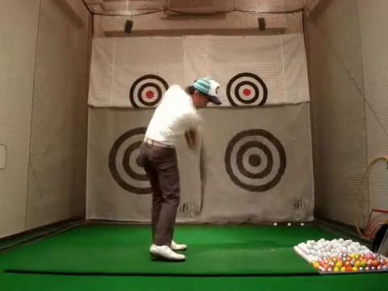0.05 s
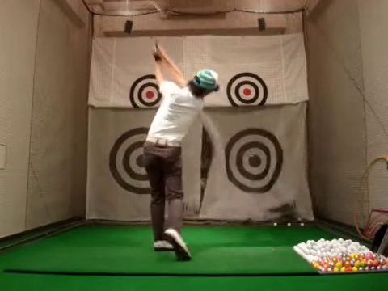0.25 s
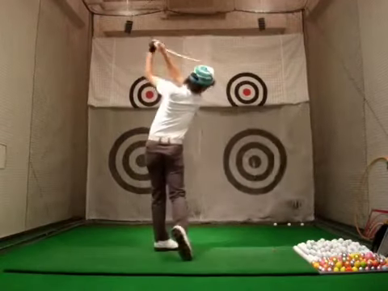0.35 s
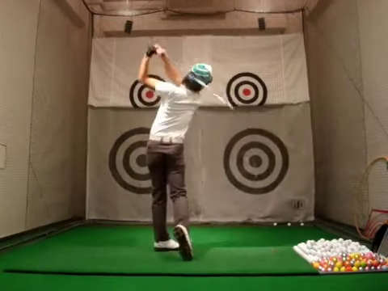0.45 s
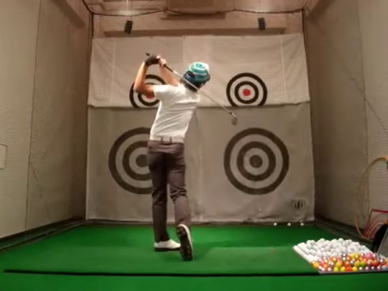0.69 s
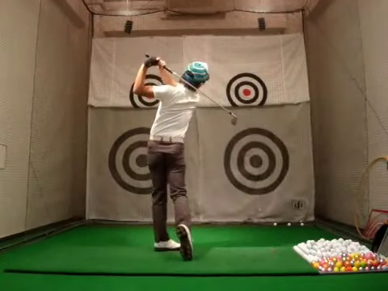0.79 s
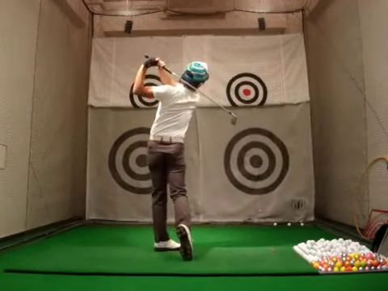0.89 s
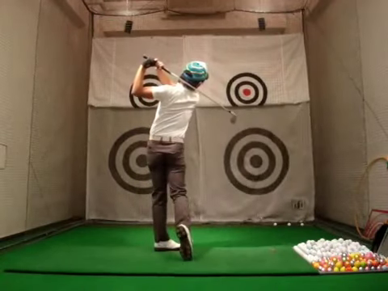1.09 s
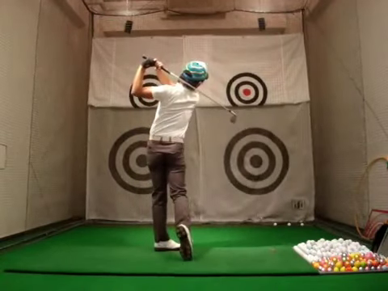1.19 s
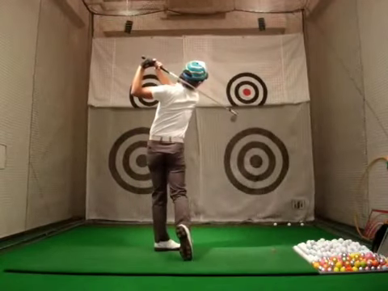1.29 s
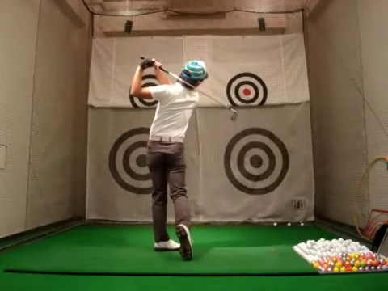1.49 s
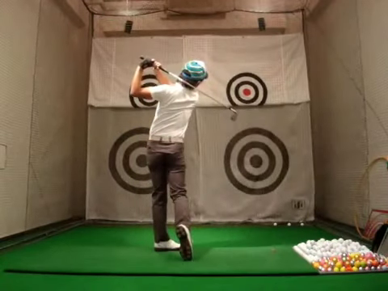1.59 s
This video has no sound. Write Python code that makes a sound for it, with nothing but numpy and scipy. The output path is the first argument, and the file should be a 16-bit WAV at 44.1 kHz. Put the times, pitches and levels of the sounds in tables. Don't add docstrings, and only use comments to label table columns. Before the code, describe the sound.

In a small hard-walled bay, a short rising swish leads to a sharp golf strike and a booming canvas impact, with ringing room tail, soft rustle and small knocks, heard by one mono microphone at some distance.

```python
import sys
import numpy as np
from scipy import signal
from scipy.fft import rfft, irfft
from scipy.io import wavfile

SR = 44100
rng = np.random.default_rng(int(sys.argv[2]) if len(sys.argv) > 2 else 0)


def to_wav(sig):
    pcm = np.clip(np.atleast_2d(sig), -1, 1) * 32767
    pcm = np.round(pcm).astype(np.int16)
    wavfile.write(sys.argv[1], SR, pcm.T)


def gain_from_db(level_db):
    decades = np.asarray(level_db, float) / 20
    return 10 ** decades


N = 72765
T = np.arange(N) / SR


def rms_one(x):
    return x / np.sqrt(np.mean(x ** 2) + 1e-20)


def in_time(rows):
    s, *columns = np.transpose(rows)
    return [np.interp(T, s, c) for c in columns]


def at_hz(points, hz):
    point_hz, value = np.array(points)[:, 0], np.array(points)[:, 1]
    return np.interp(np.log(hz), np.log(point_hz), value)


def drift(rate_hz):
    r = np.exp(-2 * np.pi * rate_hz / SR)
    slow = signal.lfilter([1], [1, -2 * r, r * r], rng.standard_normal(N + SR))
    return rms_one(slow[SR:])


EDGES_HZ = 28 * 2 ** np.arange(0, 9.4, 1 / 3)


def bands():
    hz, noise = np.fft.rfftfreq(N, 1 / SR), rfft(rng.standard_normal(N))
    centres_hz = np.sqrt(EDGES_HZ[1:] * EDGES_HZ[:-1])
    place = np.interp(np.log(hz + 1), np.log(centres_hz), np.arange(len(centres_hz)))
    out = []
    for k in range(len(centres_hz)):
        window = np.cos(np.pi / 2 * np.clip(place - k, -1, 1))
        out.append(irfft(noise * window, N))
    return centres_hz, out


def shares(spectrum, hz):
    gain = gain_from_db(at_hz(spectrum, np.minimum(hz, 9900)))
    width_hz = hz * (2 ** (1 / 3) - 1)
    return gain / np.sqrt(np.sum(gain ** 2 * width_hz * 2 / SR))


def resonate(x, hz, width_hz):
    r = np.exp(-np.pi * width_hz / SR)
    poles = [1, -2 * r * np.cos(2 * np.pi * hz / SR), r * r]
    return signal.lfilter([(1 - r * r) / 2, 0, (r * r - 1) / 2], poles, x)


def struck(hits, modes):
    contact_cycles = 0.6
    out, luck = np.zeros(N), rng.normal(0, 1, (len(hits), len(modes), 2))
    for (s, db), row in zip(hits, luck):
        since = np.maximum(T - s, 0)
        for (hz, mode_db, t60), (a, b) in zip(modes, row):
            decay = gain_from_db(db + mode_db + 1.06 * a - 60 * since / t60)
            onset = 1 - np.exp(-since * hz / contact_cycles)
            out += np.sign(b) * decay * np.sin(2 * np.pi * hz * since) * onset
    return out


# (frequency [Hz], level [dB], t60 [s])
FACE = [(1000, -8, .005), (1900, -7, .006), (3000, -6, .006), (4600, 2, .012), (8000, -4, .005),
        (14500, -2, .004)]


def crack():
    strike_s, scuff_rise_s, scuff_fall_s = .22045, .0012, .004
    scuff_db, crack_db = -9.5, -7
    offset = T - strike_s
    since = np.maximum(offset, 0)
    envelope = np.exp(np.where(offset < 0, offset / scuff_rise_s, -offset / scuff_fall_s))
    scuff = envelope * resonate(rng.standard_normal(N), 3500, 4200)
    ring = sum(gain_from_db(db - 60 * since / t60) * np.sin(2 * np.pi * hz * since) for hz, db, t60 in FACE)
    highpass = signal.butter(2, 350, "high", fs=SR, output="sos")
    return signal.sosfilt(highpass, gain_from_db(scuff_db) * scuff - gain_from_db(crack_db) * ring)


# (time [s], level [dB], build-up [s], share of room t60 [1])
STRIKES = [
    (.221, -6, 0.0082, 0.91),
]
SLAMS = [
    (.276, -9, 0.029, 1.04),
    (.335, -19, 0.015, 1.27),
    (.42, -26.5, .01, 1.22),
]
SLIDES = [
    (.735, -37.5, 0.023, 0.92),
    (.865, -36, 0.0074, 0.71),
    (1.256, -47.5, 0.0015, 1),
]
BOUNCES = [
    (.88, -39, 0.0095, 0.71),
    (.908, -33.5, 0.018, 0.74),
    (1.268, -59, 0.0044, 0.38),
]
# (frequency [Hz], density [dB per Hz])
STRIKE_COLOUR = [(35, -56), (60, -25.5), (766, -13), (1690, -2.5), (1880, -1.5), (3580, -3), (4830, -8.5),
                 (8250, -10), (10000, -19.5), (13000, -49), (22000, -120)]
CANVAS_COLOUR = [(24, -62), (40, -30), (156, -12), (299, -0.5), (611, 0), (844, 0), (4770, -6), (8120, -16),
                 (10000, -25), (13000, -49), (22000, -120)]
RUSTLE_COLOUR = [(120, -42), (200, -30), (629, -9), (1030, -5.5), (1250, -6), (1500, -7), (10000, -15),
                 (13000, -48), (22000, -120)]
MAT_COLOUR = [(59, -49), (100, -32), (330, -14.5), (648, -2.5), (1430, -15), (1800, -16), (2100, -14.5),
              (10000, -32.5), (13000, -56), (22000, -120)]
# (frequency [Hz], t60 [s])
BAY = [(60, 0.72), (250, 0.5), (1000, .6), (3000, 0.56), (8000, 0.61), (15000, 0.72)]


def blows():
    grain_db, grain_s = 2.5, 0.017
    slide_top_hz, slide_top_db = 10140, -10
    hz, noise = bands()
    power, t60, grain = np.zeros((len(hz), N)), at_hz(BAY, hz)[:, None], drift(350)
    kinds = [(STRIKES, STRIKE_COLOUR, 0), (SLAMS, CANVAS_COLOUR, 0),
             (SLIDES, RUSTLE_COLOUR, slide_top_db), (BOUNCES, MAT_COLOUR, 0)]
    for rows, colour, top_db in kinds:
        gain = shares(colour, hz) * gain_from_db(top_db * (hz > slide_top_hz))
        for s, db, rise_s, share in rows:
            since = np.maximum(T - s, 0)
            level = gain_from_db(db + grain_db * grain * np.exp(-since / grain_s))
            swell = (1 - np.exp(-since / rise_s)) * level
            decay = np.exp(-6 * np.log(10) * since / t60 / share)
            power += (gain[:, None] * swell) ** 2 * decay
    return np.sum(np.sqrt(power) * noise, axis=0)


# (time [s], level [dB])
SNAPS = [
    (.279, -16.5),
    (.292, -23),
    (.306, -21),
    (.318, -23),
    (.332, -25),
    (.345, -19),
    (.358, -22),
]
# (frequency [Hz], level [dB], t60 [s])
SHEET = [(139, -27, 0.49), (201, -13, 0.088), (262, -3.5, 0.073), (354, -2.5, 0.11), (640, -1, 0.062),
         (835, -1, 0.038), (993, -5, 0.047)]


def sheet_booms():
    return struck(SNAPS, SHEET)


# (time [s], level [dB])
KNOCKS = [
    (.882, -43.5),
    (.911, -34),
    (.918, -30.5),
    (.925, -51),
    (.932, -41),
    (.942, -38),
    (.955, -41),
    (.968, -45),
]
# (frequency [Hz], level [dB], t60 [s])
FLOOR = [(280, -9, 0.082), (450, 2, .035), (545, -4, 0.041), (694, -6, 0.026), (890, 1, 0.029)]


def mat_knocks():
    return struck(KNOCKS, FLOOR)


# (time [s], level [dB])
SWING = [(.12, -53.5), (.146, -43.5), (.175, -33.5), (.19, -29.5), (.2, -24), (.211, -31), (.225, -39),
         (.26, -71)]
# (frequency [Hz], density [dB per Hz])
RUSH = [(80, -38), (200, -14.5), (310, -4), (400, -4), (600, -7), (850, -6), (1600, -10), (3000, -19.5),
        (10000, -30.5)]
# (time [s], pitch [Hz], level [dB])
SHAFT = [(.15, 470, -90), (.17, 470, -47), (.179, 462, -27), (.19, 458, -26), (.197, 462, -23),
         (.204, 495, -26), (.212, 545, -18), (.2165, 548, -32), (.235, 530, -60)]


def swing():
    brighten_db_per_octave_db, octave_db, rough_rad = 0.035, -15, .05
    hz, noise = bands()
    speed_db = in_time(SWING)[0]
    octaves = np.log2(np.maximum(hz / 1000, 1))
    tilt_db = brighten_db_per_octave_db * np.outer(octaves, speed_db - speed_db.max())
    rush = gain_from_db(speed_db + 1.2 * drift(62.7)) * (shares(RUSH, hz) @ (gain_from_db(tilt_db) * noise))
    pitch_hz, db = in_time(SHAFT)
    phase = 2 * np.pi * np.cumsum(pitch_hz) / SR + rough_rad * drift(95)
    tone = gain_from_db(db + 3) * (np.sin(phase) + gain_from_db(octave_db) * np.sin(2 * phase))
    return (T < .3) * (rush + tone)


# (frequency [Hz], density [dB per Hz])
AIR = [(30, -27), (85, -23), (150, -17.5), (300, -11), (700, -6), (1800, -10), (3500, -14), (5500, -21),
       (10000, -27)]
# (frequency [Hz], width [Hz], level [dB])
DUCTS = [(650, 45, -60), (1655, 40, -55)]
# (time [s], level [dB])
HUM = [(0, -79), (.06, -63), (.12, -82), (.84, -91), (.93, -63), (1.02, -64), (1.2, -67), (1.33, -65.5),
       (1.65, -61)]


def ventilation():
    air_db, patchy_db = -47, .5
    hum_hz, drone_hz, drone_db, drone_fade_db_per_s = 121, 184, -61, 6
    hz, noise = bands()
    together = drift(1)
    air = np.zeros(N)
    for gain, band in zip(shares(AIR, hz), noise):
        air += gain * gain_from_db(patchy_db * (together + drift(4.6))) * band
    ducts = np.zeros(N)
    for duct_hz, width_hz, db in DUCTS:
        tone = rms_one(resonate(rng.standard_normal(N), duct_hz, width_hz))
        ducts += gain_from_db(db + 0.76 * drift(8.1)) * tone
    hum_gain = gain_from_db(in_time(HUM)[0] + 3.5 + drift(3))
    hum = hum_gain * np.sin(2 * np.pi * hum_hz * T + 0.34 * drift(3))
    drone_gain = gain_from_db(drone_db - drone_fade_db_per_s * T + 2.1 * drift(5))
    drone = drone_gain * np.sin(2 * np.pi * drone_hz * T + 0.19 * drift(2.5))
    return gain_from_db(air_db) * air + ducts + hum + drone


def scene():
    mix = crack() + blows() + sheet_booms() + mat_knocks() + swing() + ventilation()
    return mix[None]


def low_pass(x):
    return signal.sosfilt(signal.butter(12, 16830, fs=SR, output="sos"), x)


# (frequency [Hz], level [dB])
MIC = [(9900, 0), (10500, -6), (12500, -8), (13800, -3.5), (16000, -5.5)]
# (time [s], level [dB])
GAIN = [(0, -3.5), (.217, -2), (.224, -7), (.3, -3.5), (.4, -5.5), (.5, -6.5), (.6, -5), (.66, -5),
        (.72, -4.5), (.8, -4.5), (.87, -2), (.95, -2), (1.2, -1.5), (1.65, -2.5)]


def record(dry):
    clip_top, cutoff_hz = 1.2, 16070
    hz = np.fft.rfftfreq(N, 1 / SR) + 1
    coloured = irfft(rfft(dry) * gain_from_db(at_hz(MIC, hz)), N)
    heard = gain_from_db(in_time(GAIN)[0]) * coloured
    rounded = clip_top * np.tanh(heard / clip_top)
    mix = irfft(rfft(rounded) * (hz < cutoff_hz), N)
    return low_pass(mix)


dry = scene()
out = record(dry)
to_wav(out)
```